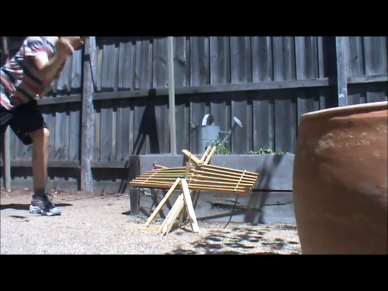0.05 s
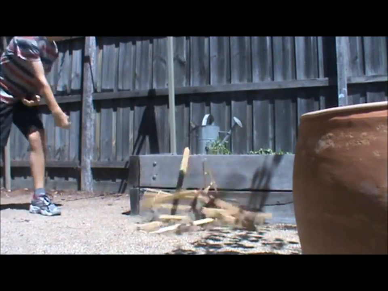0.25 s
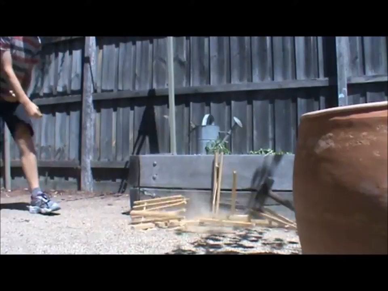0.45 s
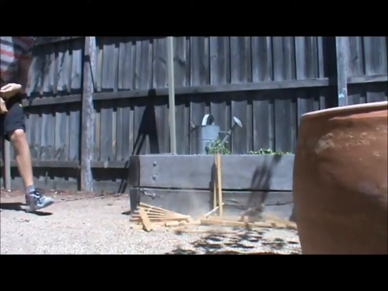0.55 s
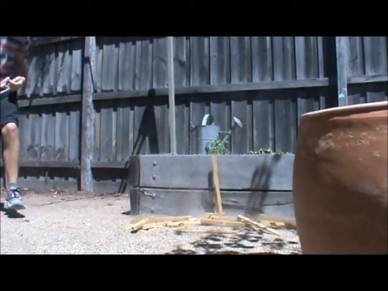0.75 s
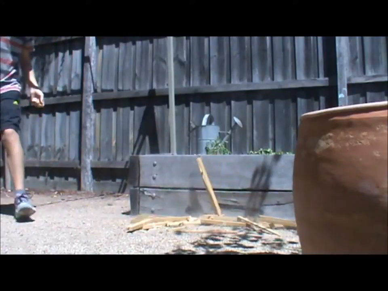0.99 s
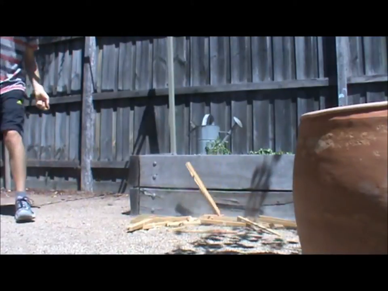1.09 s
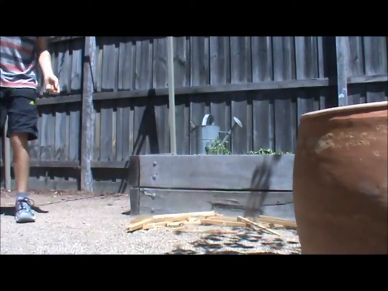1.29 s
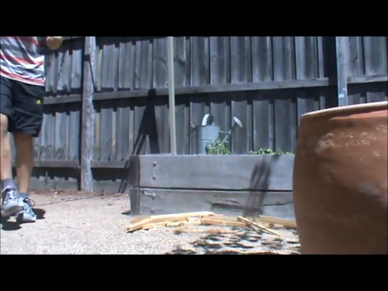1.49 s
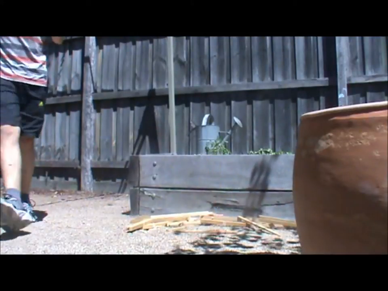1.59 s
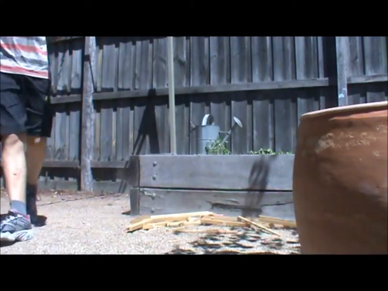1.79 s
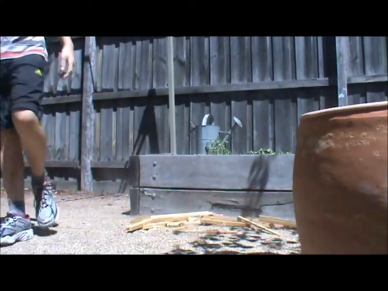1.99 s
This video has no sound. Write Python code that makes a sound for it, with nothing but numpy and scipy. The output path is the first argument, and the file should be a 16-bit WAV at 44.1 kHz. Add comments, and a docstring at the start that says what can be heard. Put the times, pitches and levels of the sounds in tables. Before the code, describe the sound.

Wooden sticks collapse with a loud, clattering crash in a yard, one toppling late.

```python
"""In a fenced yard, a rack of wooden sticks is smashed: hundreds of tiny knocks make one dense crash.
Chips tinkle, long sticks land and ring, and something heavy bounces with dull thuds.
One last stick topples late with a bright clack. Shoes crunch on the grit over a faint hush of air.
The fence throws the sound back, and a limiter turns the loudest blows down."""
import sys
import numpy as np
from scipy import signal
from scipy.fft import rfft, irfft, next_fast_len
from scipy.io import wavfile
from scipy.ndimage import uniform_filter1d, minimum_filter1d

SR = 44100
rng = np.random.default_rng(int(sys.argv[2]) if len(sys.argv) > 2 else 0)


def waveform_to_disk(signal):
    """Save audio, clipped to [-1, 1], as 16-bit WAV at the path in sys.argv[1]."""
    frames = np.transpose(np.atleast_2d(signal))
    scaled = np.clip(frames, -1, 1) * 32767
    samples = np.round(scaled).astype(np.int16)
    wavfile.write(sys.argv[1], SR, samples)


N = 90404
T = np.arange(N) / SR
HIT_T = np.arange(SR // 4) / SR  # the clock of one hit, in seconds

# Tone colours, or how strong each pitch is: (frequency [Hz], level [dB])
AIR_TONE = [(15, -37), (25, -6), (119, -1), (509, -17), (598, -14), (970, -13.5), (1050, -16.5),
            (1660, -15), (1800, -13), (2700, -16), (3720, -19), (4380, -17.5), (5280, -21.5), (8810, -22),
            (15500, -37.5)]
GROUND_TONE = [(25,-12),(50,-9),(100,-5),(170,-9),(400,-20),(1500,-60)]
HISS_TONE = [(500,-4),(2000,-6),(4500,-8.5),(6200,-12),(8800,0.5),(11000,-11),(15000,-21)]
SWISH_TONE = [(400,-22.5),(720,-14),(850,-0.5),(980,-6.5),(1250,-10.5),(1600,-18),(4000,-52)]
ECHO_TONE = [(80,-7),(300,-6.5),(700,-7.5),(5000,1),(9000,1.5),(13000,-7.5)]
GRIT_TONE = [(100,-24.5),(500,-8),(1000,-8.5),(1800,-2),(3000,-7),(4500,-15.5),(6500,-22.5),(9000,-21.5),(15000,-55.5)]
SLAP_TONE = [(100,-14.5),(700,-8),(1500,-1.5),(2300,2),(4200,-2),(6300,-7),(8300,-5.5),(11000,-18.5),(13200,-29),(15500,-48)]
CHIP_TONE = [(1000,-16),(4000,-6),(6200,-8),(8500,5),(11000,-14),(15500,-36)]
CRACK_TONE = [(100,-17),(600,-7.5),(1300,-1.5),(1650,0),(2100,3),(3200,1),(4400,-4.5),(6200,-14),(8500,-12),(11000,-23.5),(15500,-43)]
RATTLE_TONE = [(40,-26),(150,-8),(300,-1.5),(700,-13.5),(1400,-4.5),(2500,-7),(4400,-11.5),(6200,-13.5),(8800,-27),(11500,-22),(15500,-33)]
CRASH_TONE = [(24, -43), (40, -22), (146, -5.5), (213, -13), (253, -15), (342, -10), (817, -10.5),
              (903, -7), (998, -10.5), (1960, -4), (4570, -7.5), (6160, -11.5), (7340, -4.5), (12700, -19),
              (15500, -32)]

# Noises that swell and fade: (peak time [s], rise [s], fall [s], level [dB])
GROUND_SWELLS = [(.275,0.018,0.027,-35),(.345,0.018,0.027,-36)]
HISS_SWELLS = [(.188,0.021,0.013,-34)]
SWISH_SWELLS = [(1.14,0.044,0.15,-37.5),(1.90,0.033,0.36,-38.5)]
SHOE_SCUFFS = [(.105,0.043,0.042,-33.5),(.126,0.0047,0.0048,-37),(.22,0.018,.02,-40.5),(1.0575,0.0018,0.031,-36),(1.18,0.045,0.042,-38.5),(1.41,0.027,.02,-35),(1.50,0.027,.05,-50.5),(1.70,0.057,0.057,-39.5),(1.749,0.0034,.012,-32),(1.772,0.015,0.02,-31),(1.825,0.031,0.04,-29.5)]

# The notes a struck thing rings with: (frequency [Hz], level [dB], fade time [s])
# A fade time, or t60, is how long a sound takes to drop by 60 dB.
HEAVY_NOTES = [(95,-8,.1),(121,-1,.14),(168,-2,.12),(200,-1,.07),(255,-3,.06),(306,-1,.11),(420,-10,.06),(525,-11,.07),(640,-17,.05)]
LAST_STICK_NOTES = [(775,-26,.14),(2077,0,.085),(2260,-6,.025),(2465,-7,.07),(2612,-12,.06),(3480,-17,.1),(4030,-20,.1),(4310,-18,.11),(5645,-17,.11)]
LONG_STICK_NOTES = [(888,-11,.13),(1310,-8,.04),(1390,0,.125),(1785,-8,.05),(2020,-5,.05),(2190,-5,.055),(2372,-3,.05),(2640,-11,.04),(3270,-11,.07),(3940,-13,.07),(4250,-12,.075)]

# How alike the two ears hear a noise: (frequency [Hz], likeness [0 to 1])
EAR_LIKENESS = [(60,1),(250,0.96),(1000,0.64),(4000,0.5),(8000,0.32),(12000,0.94)]
# How long the yard echoes: (frequency [Hz], fade time [s])
ECHO_FADE = [(100,0.3),(500,0.9),(2000,0.34),(8000,0.54),(15000,0.16)]
# Stones snapping under a shoe: (time [s], level [dB], pitch [Hz])
STONE_SNAPS = [(.095,-28,2200),(.1245,-23,1750),(.127,-23,1800),(1.0775,-25,2100),(1.0995,-27,1900),(1.102,-26,1900),(1.179,-22,1950),(1.406,-24,1500),(1.764,-19,1700),(1.7695,-18,1600),(1.775,-17,2500),(1.818,-22,3500),(1.8215,-22,3300),(1.851,-23,2700),(1.875,-11,1900)]
# The heavy piece bouncing; more tilt is brighter: (time [s], level [dB], tilt [dB/octave])
BOUNCES = [(.5715,-8.5,0),(.678,-12,-1),(.819,-19.5,-11),(.858,-32,-1)]
# Where its thud sits; pan above zero is to the left: (frequency [Hz], pan [dB])
THUD_PAN = [(70,1),(130,1.5),(280,-4.5),(550,-15),(1200,-4)]
# The last stick slapping the grit: (time [s], level [dB], tilt [dB/octave], fade time [s])
GRIT_SLAPS = [(1.332,-15.5,0.5,0.031),(1.3363,-15,0,0.052),(1.352,-24.5,1,0.092)]
# Long sticks landing: (time [s], level [dB], tilt [dB/octave], pan [dB], pitch [ratio], crack [dB])
STICK_LANDINGS = [(.516,-15,-2.5,-1.5,0.99,0),(.610,-20.5,2,0,.91,-2),(.680,-25,-5,-2,.95,-4.5),(.732,-23,-1,-5.5,1,-1.5),(.751,-25.5,-8,5.5,0.99,-7),(.763,-30,-4,-3,.96,-5),(.774,-27.5,4,-5,1.18,2),(0.7856,-14.5,3.5,-2,0.99,-2)]
# Stick hitting stick: (time [s], level [dB], tilt [dB/octave], fade time [s], pan [dB])
STICK_CRACKS = [(.238,1,4,0.02,-2.5),(.263,-12,9,.03,0),(.269,-14,0,.015,-1),(.278,-13.5,6,0.034,-10),(.291,-12,2,0.014,0),(.300,-27,9,.03,-1),(.309,-16,-0.5,0.017,-9),(.319,-24,1,0.011,0),(.324,-6,14,0.026,-3.5),
                (0.345,-11,-10,.01,-3.5),(0.482,-25,13,0.04,4),(0.502,-22,-10,.02,-3),(0.574,-17.5,2,0.026,-4),(.609,-15,1,0.054,-6),(0.621,-14,-5,0.032,-5),
                (0.626,-14,7,0.044,-3),(0.671,-19,5.5,.025,-2.5),(.712,-15.5,0.5,0.039,-5),(0.729,-25,8.5,0.017,5),(0.865,-36,-1,0.052,-11),(0.881,-33,4.5,0.053,-4)]


def amp(db):
    """Turn decibels into a number to multiply by."""
    return 10 ** (np.asarray(db) / 20)


def unit(x):
    """Scale x to an average strength (rms) of 1."""
    return x / np.sqrt(np.mean(x ** 2) + 1e-20)


def along(points, hz):
    """Read between the rows of a (frequency, value) table, on a musical scale."""
    freqs, values = np.transpose(points)
    return np.interp(np.log(hz + 1), np.log(freqs + 1), values)


def coloured(x, tone, tilt_db=0):
    """Give x a tone colour, made brighter by tilt_db for each octave."""
    n = x.shape[-1]
    padded = next_fast_len(n + 8192)
    hz = np.fft.rfftfreq(padded, 1 / SR)
    octaves = np.log2(np.maximum(hz, 300) / 2000)
    return irfft(rfft(x, padded) * amp(along(tone, hz) + tilt_db * octaves), padded)[..., :n]


def widened(pair):
    """Blend two unrelated noises into a left and a right that are partly alike."""
    likeness = along(EAR_LIKENESS, np.fft.rfftfreq(N, 1 / SR))
    angle = np.arccos(np.clip(likeness, -1, 1)) / 2
    mid, side = irfft(rfft(pair) * [np.cos(angle), np.sin(angle)], N)
    return unit(np.array([mid + side, mid - side]))


def add(out, start, x, pan_db=0):
    """Mix x into the stereo track at start seconds."""
    part = out[:, round(start * SR):][:, :len(x)]
    part += x[:part.shape[1]] * amp([[pan_db / 2], [-pan_db / 2]])


def rush(tone):
    """Steady stereo noise with a tone colour."""
    return widened(coloured(rng.standard_normal((2, N)), tone))


def burst(tone, t60, tilt_db=0):
    """A puff of noise that starts at once and dies away."""
    return unit(coloured(rng.standard_normal(len(HIT_T)), tone, tilt_db)) * amp(-60 * HIT_T / t60)


def ring(notes, tilt_db, attack_s, scatter_db, pitch=1):
    """A struck thing rings with several fading notes, mixed a little differently on each blow."""
    hz, db, t60 = np.transpose(notes)[:, :, None]
    gain = amp(db + tilt_db * np.log2(hz / hz[0]) + scatter_db * rng.standard_normal(hz.shape))
    signs = (-1) ** np.arange(len(hz))[:, None]
    waves = signs * np.sin(2 * np.pi * pitch * hz * HIT_T) * amp(-60 * HIT_T / t60)
    onset = 1 - np.exp(-HIT_T / attack_s)
    return (gain * waves).sum(0) / np.sqrt(np.sum(gain ** 2) / 2) * onset


def crackle(tone, spread_db, hiss, count):
    """Random ticks of different sizes over some smooth hiss, in stereo."""
    tracks = []
    for _ in range(2):
        places = rng.integers(0, N, count)
        signs = rng.choice([-1, 1], count)
        sizes = amp(spread_db * np.minimum(rng.exponential(size=count), 4))
        tracks.append(np.bincount(places, signs * sizes, N))
    ticks = unit(np.array(tracks))
    return widened(coloured(ticks + hiss * rng.standard_normal((2, N)), tone))


def swells(rows):
    """A loudness curve that rises and falls once for each row."""
    power = np.zeros(N)
    for peak, rise, fall, db in rows:
        distance = np.where(T < peak, (peak - T) / rise, (T - peak) / fall)
        power += amp(2 * db) * np.exp(-2 * distance ** 1.2)
    return np.sqrt(power)


def clatter(tone, t60, click, spread_db, count):
    """Sticks knock count times over one second, each knock a click and six random notes."""
    out, t = np.zeros((2, N)), HIT_T[:SR // 12]
    for k in range(count):
        jitter, size, pan = rng.random(3)
        hz = rng.uniform(600, 13000, (6, 1))
        fade = amp(-60 * t / t60 * np.sqrt(hz / 2000))  # high notes die sooner
        notes = (np.sin(2 * np.pi * hz * t) * fade).sum(0)
        tick = click * rng.standard_normal(len(t)) * amp(-60 * t / .007)
        add(out, (k + jitter) / count, amp(spread_db * size) * (notes + tick), 9 * (pan - .5) - 1)
    out = coloured(out, tone)
    return out / np.std(out[:, :SR])


def air(level_db=-44.5):
    """The faint, steady hush of still air."""
    return amp(level_db) * rush(AIR_TONE)


def ground_shake():
    """The ground rumbles twice under the blow."""
    return swells(GROUND_SWELLS) * rush(GROUND_TONE)


def thin_hiss():
    """A short, thin hiss just before the blow."""
    return swells(HISS_SWELLS) * rush(HISS_TONE)


def swishes():
    """A soft rush of noise after each of two steps."""
    return swells(SWISH_SWELLS) * rush(SWISH_TONE)


def yard_echo(x, fence_db=-7, fence_t60=.12, tail_db=-11.5, delay_s=.004):
    """Sound bounces quickly off the fence and a planter, then leaves a faint tail."""
    n = SR // 2
    hz, t, bands = signal.stft(rng.standard_normal((2, n)), SR, nperseg=256)
    fade = amp(-60 * t / along(ECHO_FADE, hz)[:, None])
    tail = signal.istft(bands * fade, SR, nperseg=256)[1][:, :n]
    fence = rng.standard_normal(tail.shape) * amp(-60 * np.arange(n) / SR / fence_t60)
    answer = amp(tail_db) * tail / np.linalg.norm(tail[0])  # how the yard answers one click
    answer += amp(fence_db) * fence / np.linalg.norm(fence[0])
    answer = np.pad(answer, ((0, 0), (round(delay_s * SR), 0)))
    echo = coloured(signal.fftconvolve(x.mean(0)[None], answer, axes=1)[:, :N], ECHO_TONE)
    return echo + 0.12 * echo[::-1]  # each side leaks into the other


def steps(snap_t60=.006, snap_rise_s=.0003, click_db=-7):
    """Grit crunches under the shoes and single stones snap."""
    out = swells(SHOE_SCUFFS) * crackle(GRIT_TONE, spread_db=3.5, hiss=0.46, count=2500)
    onset = 1 - np.exp(-HIT_T / snap_rise_s)
    for start, db, hz in STONE_SNAPS:
        snap = np.sqrt(2) * np.sin(2 * np.pi * hz * HIT_T) * amp(-60 * HIT_T / snap_t60)
        click = amp(click_db) * burst(GRIT_TONE, t60=.012, tilt_db=.5)
        add(out, start, amp(db) * (snap + click) * onset)
    return out * amp([[1], [-1]])  # a little to the left


def thuds(contact_s=.02, fall_db_per_s=650):
    """Something heavy bounces, booming while it touches the ground; its higher notes sit to the right."""
    out = np.zeros((2, N))
    damping = amp(-fall_db_per_s * np.maximum(HIT_T - contact_s, 0))
    for start, db, tilt_db in BOUNCES:
        add(out, start, amp(db) * damping * ring(HEAVY_NOTES, tilt_db, attack_s=.0008, scatter_db=.5))
    return np.array([coloured(out[0], [(hz, side * db / 2) for hz, db in THUD_PAN]) for side in (1, -1)])


def topple(start=1.3322, level_db=-9, free_ring_s=.009, muffle_db=-9.5):
    """The last stick rings as its tip lands, then is muffled as its whole length slaps the grit."""
    out = np.zeros((2, N))
    muffle = amp(muffle_db * np.clip((HIT_T - free_ring_s) / .0012, 0, 1))
    clack = ring(LAST_STICK_NOTES, tilt_db=0, attack_s=0.00032, scatter_db=0.5)
    add(out, start, amp(level_db) * muffle * clack, pan_db=-3)
    for slap_at, db, tilt_db, t60 in GRIT_SLAPS:
        add(out, slap_at, amp(db) * burst(SLAP_TONE, t60, tilt_db), pan_db=-.5)
    return out


def landings():
    """Long sticks hit the ground with a crack and ring as they bend to and fro."""
    out = np.zeros((2, N))
    for start, db, tilt_db, pan_db, pitch, crack_db in STICK_LANDINGS:
        crack = amp(crack_db) * burst(CRACK_TONE, t60=0.036, tilt_db=tilt_db - 2)
        notes = ring(LONG_STICK_NOTES, tilt_db, attack_s=0.00044, scatter_db=1, pitch=pitch)
        add(out, start, amp(db) * (notes + crack), pan_db)
    return out


def chips(count=44, first_s=.29, last_s=.78, ping_hz=8440, ping_t60=.018):
    """Small chips fall all round, each with a tick and one short, high ping."""
    out = np.zeros((2, N))
    for k, (jitter, pitch, size, pan) in enumerate(rng.standard_normal((count, 4))):
        progress = np.clip((k + .5 * jitter) / count, 0, 1)
        hz = ping_hz * np.exp(0.079 * pitch)
        ping = np.sin(2 * np.pi * hz * HIT_T) * amp(-60 * HIT_T / ping_t60)
        tick = burst(CHIP_TONE, t60=0.014)
        db = -27 + 2 * size - 9 * progress  # later chips are softer
        add(out, first_s + progress * (last_s - first_s), amp(db) * (ping + tick), 2 * pan)
    return out


def cracks():
    """Stick hits stick with a hard, dry crack that hardly rings."""
    out = np.zeros((2, N))
    for start, db, tilt_db, t60, pan_db in STICK_CRACKS:
        add(out, start, amp(db) * burst(CRACK_TONE, t60, tilt_db), pan_db)
    return out


def collapse(start=0.2316, rise_s=0.0038, hold_s=0.097, settled_s=0.823):
    """The rack bursts apart in a hail of knocks; the loose sticks rattle on as they settle."""
    age = T - start
    onset = np.clip(age / rise_s, 0, 1)
    # The crash drops fast; the rattle fades slowly until the sticks settle. Slopes are dB per second.
    crash_db = -17.5 - 183 * np.maximum(age - hold_s, 0)
    rattle_db = -27.5 - 18.5 * np.maximum(age, 0) - 240 * np.maximum(T - settled_s, 0)
    splintering = crackle(CRASH_TONE, spread_db=3, hiss=0.29, count=4000)
    hail = clatter(CRASH_TONE, t60=.04, click=3.5, spread_db=11, count=420)
    rattle = clatter(RATTLE_TONE, t60=0.056, click=3.8, spread_db=5.5, count=170)
    crash = amp(-3.5) * hail + amp(-3) * splintering
    return onset * (amp(crash_db) * crash + amp(rattle_db) * rattle)


def scene():
    """Wood, steps and thuds with their echoes, over the soft background noises."""
    smash = collapse() + chips() + cracks()
    wood = sum(x + yard_echo(x) for x in (smash, landings(), topple()))
    near = steps() + thuds()
    soft = swishes() + thin_hiss() + ground_shake()
    return wood + near + amp(-2.5) * yard_echo(near) + soft + air()


def record(dry, limit_db=-1.5, hold_s=0.0058, top_hz=15900):
    """A limiter briefly turns down the loudest peaks, then the highest treble is cut off."""
    window = round(hold_s * SR)
    needed_gain = np.minimum(1, amp(limit_db) / (np.abs(dry).max(0) + 1e-9))
    smooth_gain = uniform_filter1d(minimum_filter1d(needed_gain, window), window)
    padded = next_fast_len(N + SR // 2)
    kept = np.fft.rfftfreq(padded, 1 / SR) < top_hz
    return irfft(rfft(dry * smooth_gain, padded) * kept, padded)[:, :N]


dry = scene()
out = record(dry)
waveform_to_disk(out)
```